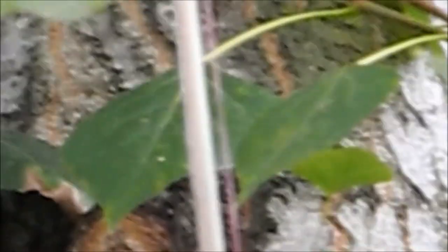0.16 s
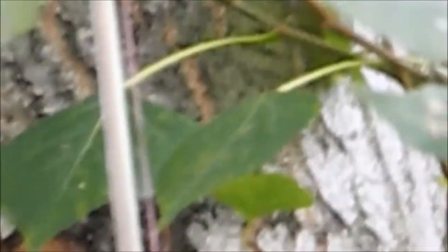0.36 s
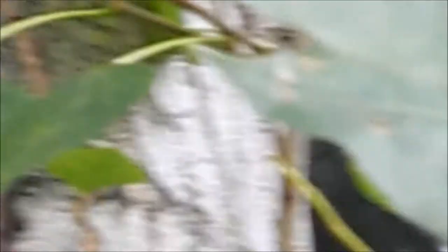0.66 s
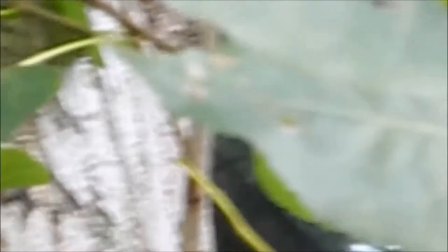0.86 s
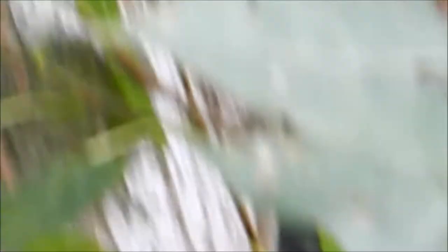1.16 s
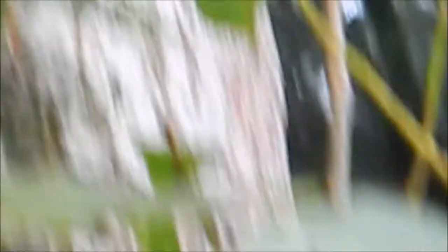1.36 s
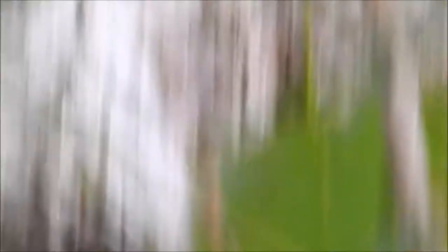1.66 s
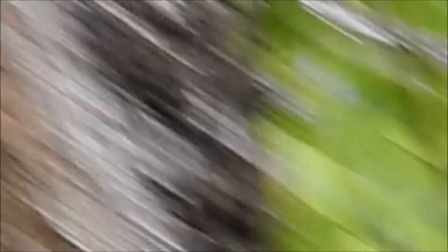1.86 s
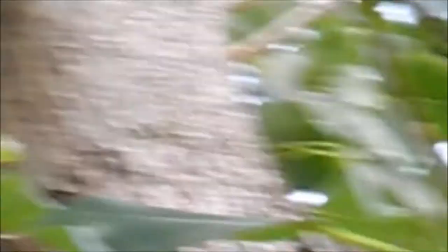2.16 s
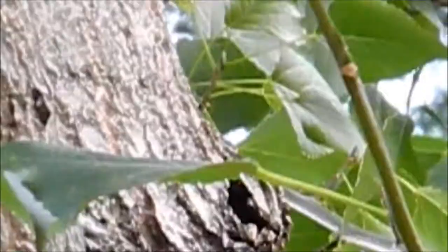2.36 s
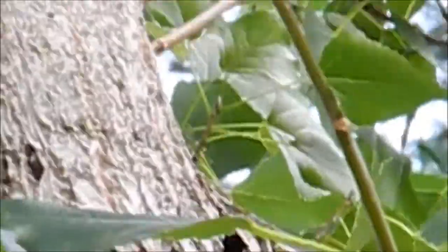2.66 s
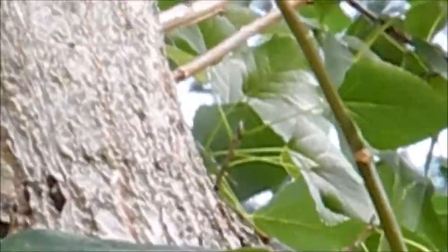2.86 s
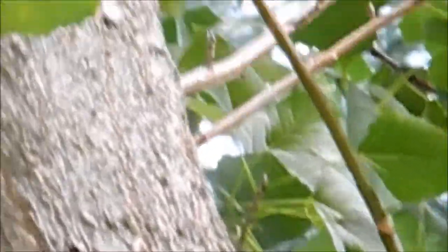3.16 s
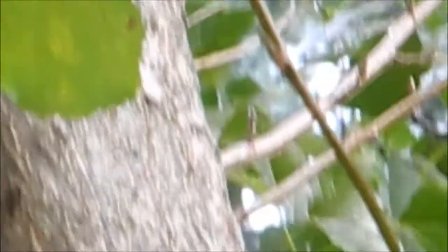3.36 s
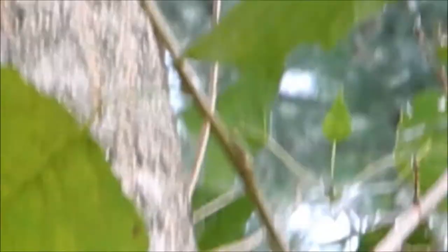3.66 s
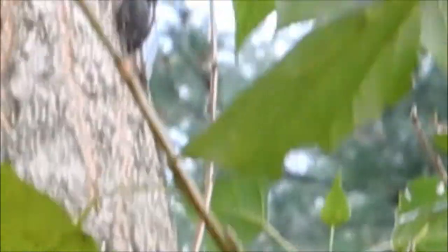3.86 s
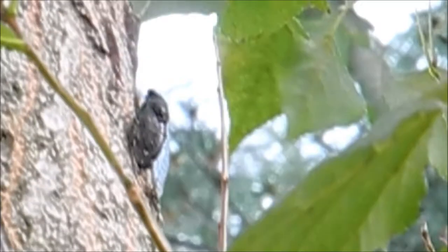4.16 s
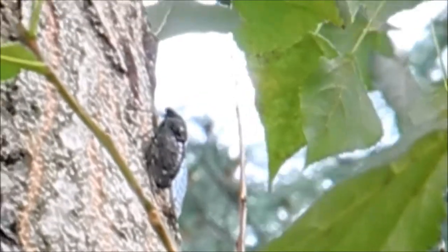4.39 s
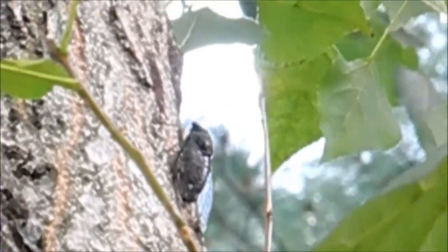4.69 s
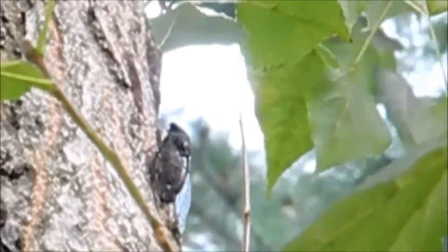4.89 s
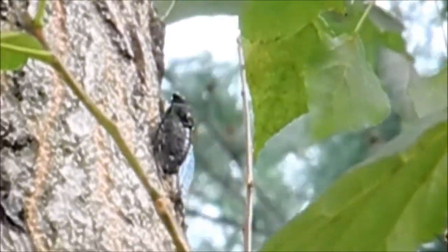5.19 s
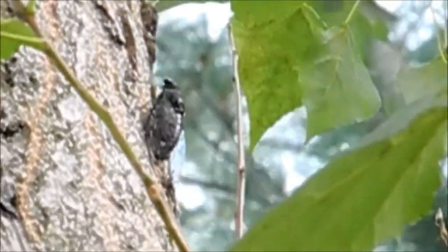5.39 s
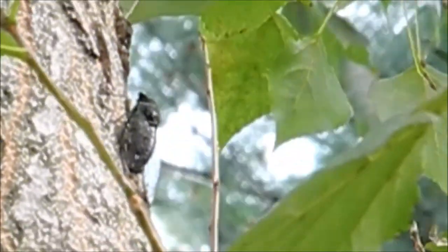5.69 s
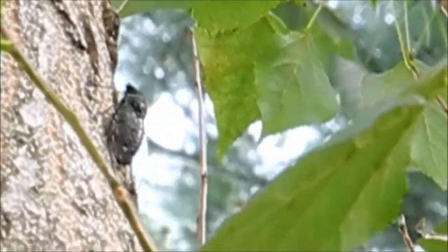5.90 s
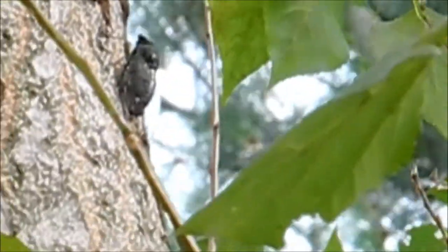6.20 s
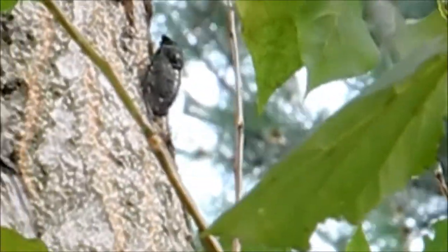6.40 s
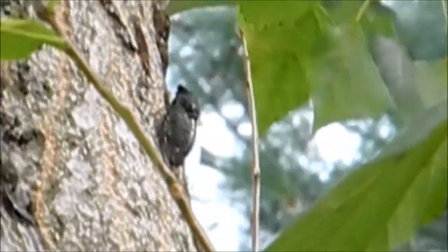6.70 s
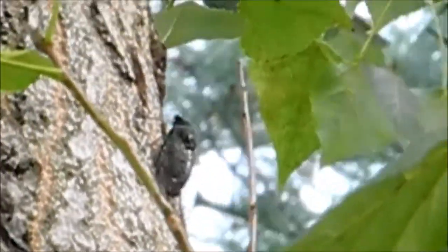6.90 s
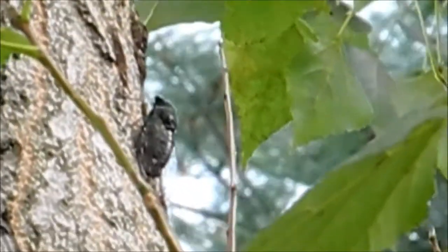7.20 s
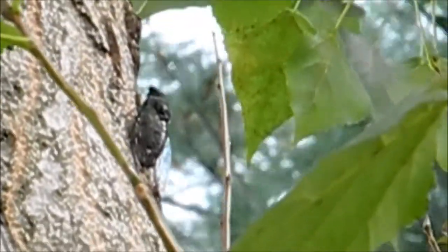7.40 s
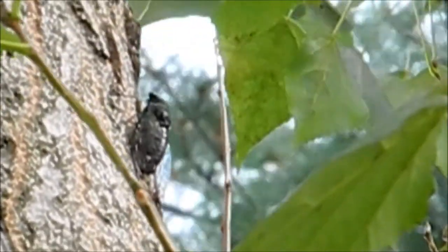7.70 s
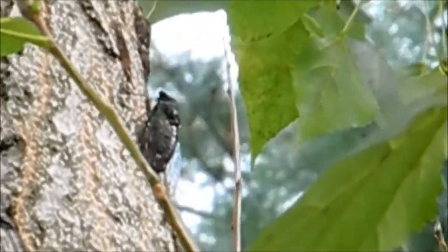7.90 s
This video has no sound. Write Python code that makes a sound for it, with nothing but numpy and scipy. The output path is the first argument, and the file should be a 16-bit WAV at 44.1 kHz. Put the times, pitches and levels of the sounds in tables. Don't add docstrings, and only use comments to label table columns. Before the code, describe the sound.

Distant road roar and a thin, high shimmer open the scene, with small bumps near the microphone and a rough engine drone fading by two seconds. Meanwhile a cicada starts faintly, swells and brightens, then dominates with a dry, metallic, rapidly pulsing rattle, slightly right of centre. Leaves and bark add short, fluttering reflections; the background is pushed down.

```python
import sys
import numpy as np
from scipy import signal
from scipy.fft import rfft, irfft
from scipy.io import wavfile
from scipy.ndimage import uniform_filter1d

SR = 44100
rng = np.random.default_rng(int(sys.argv[2]) if len(sys.argv) > 2 else 0)


def decibels_to_gain(level_db):
    exponent = np.asarray(level_db, float) / 20
    return 10 ** exponent


def wrap_up_sound(samples):
    columns = np.atleast_2d(samples).T
    tamed = np.clip(columns, -1, 1)
    steps = np.round(tamed * 32767).astype(np.int16)
    wavfile.write(sys.argv[1], SR, steps)


N = 355005

# (time [s], early plateau level [dB], added treble [share], inverted
SINGING_EFFORT = [
    (0, -57, .1, .1),
    (.4, -42.5, .1, .1),
    (1.0, -35.5, .15, .2),
    (1.5, -31, 0.33, 0.36),
    (2.0, -26, 0.55, 0.28),
    (2.8, -23, 0.3, 0.35),
    (3.3, -22, 0.24, 0.22),
    (5.0, -22.5, -0.071, 0.041),
    (8.05, -22, -0.077, 0.039),
]


def in_time(rows):
    s, *columns = np.transpose(rows)
    return [np.interp(np.arange(N) / SR, s, column) for column in columns]


def at_hz(points):
    hz, value = np.transpose(points)
    grid_hz = np.arange(1, N // 2 + 2) * SR / N
    return np.interp(np.log(grid_hz), np.log(hz), value)


def rms_one(x):
    return x / np.sqrt(np.mean(x ** 2) + 1e-20)


def drift(rate):
    knots = int(N / SR * rate) + 2
    return np.interp(np.arange(N) * rate / SR, np.arange(knots), rng.standard_normal(knots))


def ring(clicks, hz, t60):
    r = decibels_to_gain(-60 / (t60 * SR))
    w = 2 * np.pi * min(hz, SR * .45) / SR
    return signal.lfilter([0, np.sin(w)], [1, -2 * r * np.cos(w), r * r], clicks + 1e-18)


def filtered(x, order, hz, kind):
    return signal.sosfilt(signal.butter(order, hz, kind, fs=SR, output="sos"), x)


def wide_noise(spectrum):
    # (frequency [Hz], left-right likeness [0-1])
    likeness = [(50, 0.83), (500, 0.78), (1200, 0.46), (2200, 0.39), (7000, 0.053), (15000, 0.12)]
    mid, side = rfft(rng.standard_normal((2, N)))
    alike = np.clip(at_hz(likeness), 0, 1)
    pair = np.sqrt(1 + alike) * mid + np.sqrt(1 - alike) * side * [[1], [-1]]
    return rms_one(irfft(pair * decibels_to_gain(at_hz(spectrum)), N))


def rumble(level_db):
    # (time [s], swell [dB])
    gusts = [(.33, 5), (1.15, 1), (1.51, 7), (1.77, 7), (2.08, 9), (3.35, 5), (3.67, 7), (4.38, -1),
             (5.18, 7), (5.47, 3), (6.9, 5), (7.761, 15)]
    gust_s, wander_db = 0.024, -2
    t = np.arange(N) / SR
    swell_db = sum(db * np.exp(-((t - s) / gust_s) ** 2) for s, db in gusts)
    low = wide_noise([(22, -22), (45, -5), (60, 0), (80, -6), (140, -30)])
    return decibels_to_gain(level_db + swell_db + wander_db * drift(6)) * low


def traffic(swing_db):
    # (time [s], traffic [dB], low rumble [dB])
    ground = [
        (0, -35, -46),
        (1.2, -34.5, -41.5),
        (2.1, -34.5, -45),
        (3.2, -35, -44),
        (3.6, -36, -52),
        (4.5, -37.5, -49.5),
        (8.05, -38.5, -49.5),
    ]
    # (frequency [Hz], level per Hz [dB])
    road_colour = [(25, -24), (60, -9.5), (130, -5), (324, -7), (550, -7), (950, -5), (1300, -8.5),
                   (2000, -14.5), (2800, -19.5), (4300, -17.5), (10500, -20.5), (15500, -40)]
    roar_db, rumble_db = in_time(ground)
    pumping = decibels_to_gain(0.12 * swing_db)
    roar = decibels_to_gain(roar_db + 0.82 * drift(16)) * pumping * wide_noise(road_colour)
    return roar + rumble(rumble_db)


def engine_drone():
    # (time [s], pitch [Hz], level [dB])
    passing = [
        (0, 600, -52),
        (.6, 540, -51),
        (.8, 520, -45.5),
        (1.4, 530, -46.5),
        (1.9, 510, -56),
        (2.5, 500, -70),
        (8.05, 500, -70),
    ]
    hz, level_db = in_time(passing)
    return decibels_to_gain(level_db) * drift(110) * np.sin(2 * np.pi * np.cumsum(hz) / SR)


def narrow_haze(swing_db):
    # (frequency [Hz], level per Hz [dB])
    haze_colour = [(4000, -26), (6000, -12), (6900, -7), (7150, -1), (7400, 0), (7700, -6), (9000, -11),
                   (11000, -15), (14000, -26)]
    level_db, follows = -32.5, 0.31
    return decibels_to_gain(level_db + follows * swing_db) * wide_noise(haze_colour)


def knocks():
    # (time [s], peak [dB], pitch [Hz], ring [cycles], rise [s], t60 [s])
    knock_list = [
        (.05, -30.5, 940, 4.7, 0.0086, 0.16),
        (.205, -34, 850, 6.5, 0.018, 0.15),
        (1.28, -37, 900, 39, 0.011, 0.1),
        (.735, -32.5, 510, 8, 0.011, 0.12),
        (1.096, -34, 1615, 110, 0.0087, 0.12),
        (1.755, -40, 65, 6.5, 0.0094, 0.1),
        (2.045, -33, 530, 11, 0.012, 0.14),
        (2.801, -34, 300, 5, 0.0062, .06),
        (3.341, -30, 630, 4.7, 0.0066, 0.087),
    ]
    out = np.zeros(N + SR)
    t = np.arange(SR // 4) / SR
    for s, peak_db, hz, cycles, rise, t60 in knock_list:
        settled = ring(rng.standard_normal(2 * len(t)), hz, cycles / hz)[len(t):]
        shape = np.minimum(t / rise, 1) * decibels_to_gain(-60 * np.maximum(t - rise, 0) / t60)
        start = round(s * SR)
        out[start:start + len(t)] += decibels_to_gain(peak_db) * shape * rms_one(settled)
    return out[:N]


def foliage(x, t60, first_s, bright_db, still=.6):
    t = np.arange(SR // 6) / SR
    out = 0
    # (sway rate [Hz], phase [radians])
    for rate, shift in [(13.7, 0), (13.7, np.pi / 2), (6.1, 0), (6.1, np.pi / 2)]:
        tail = rng.standard_normal((2, len(t))) * decibels_to_gain(-60 * t / t60) * (t > first_s)
        tail = tail / np.sqrt(2 * np.sum(tail ** 2, axis=1, keepdims=True))
        tail = tail + decibels_to_gain(bright_db) * filtered(tail, 2, 10800, "high")
        sway = np.cos(2 * np.pi * rate * np.arange(N) / SR + shift)
        out = out + signal.oaconvolve(x[None] * (still + sway), tail, axes=1)[:, :N]
    return out


def inverted_repeat(near):
    repeat_cut_hz, repeat_delay_s = 5700, .00145
    treble, echo = in_time(SINGING_EFFORT)[1:]
    dull = signal.sosfiltfilt(signal.butter(3, repeat_cut_hz, fs=SR, output="sos"), near)
    near = near - echo * np.roll(dull, round(repeat_delay_s * SR), axis=1)
    return near + treble * filtered(near, 2, 10500, "high")


def throb():
    corners = [
        .04,
        .2,
        .45,
        .70,
        .875,
        .945,
    ]
    pace_number = [0, 2, 9, 15, 20, 23, 27, 31, 42, 47, 48, 49, 54, 59, 62, 76, 82, 83]
    pace_s = [-.05, .174, .893, 1.482, 1.953, 2.263, 2.635, 3.024, 4.055, 4.545, 4.627, 4.729, 5.189, 5.68,
              5.953, 7.33, 7.957, 8.052]
    gap_db, crest_db, sag_db = -4.5, 4, 2
    uneven_db = 0.68
    number = np.arange(pace_number[-1] + 1)
    start = np.interp(number, pace_number, pace_s)
    place = np.interp(np.arange(N) / SR, start, number) % 1
    times = start[:-1, None] + np.diff(start)[:, None] * corners
    chance_db = uneven_db * rng.standard_normal((len(start), 3))
    gap, early, crest = (chance_db + [gap_db, 0, crest_db]).T
    next_gap = np.roll(gap, -1)
    levels = np.stack([gap, early - .5, early + .5, crest, crest - sag_db, next_gap], axis=1)[:-1]
    curve_db = np.interp(np.arange(N) / SR, times.ravel(), levels.ravel())
    return place, in_time(SINGING_EFFORT)[0] + curve_db


def cicada(place, swing_db, uneven_db, colour_db):
    # (place in the throb [0-1], stroke period [ms], rib delay [ms], timing jitter [ms])
    stroke_table = [(0, 4.7, 1.6, .2), (.08, 4.5, 1.45, .05), (.17, 4.0, 1.38, .012),
                    (.27, 3.78, 1.38, .01), (.58, 3.36, 1.47, .006), (.69, 3.1, 1.52, .006),
                    (.85, 2.83, 1.6, .006), (.92, 2.8, 1.65, .1), (1, 2.8, 1.7, .2)]
    # (frequency [Hz], share of the throb it follows [ratio], first rib [dB], second rib [dB])
    modes = [(4310, 0.85, -15, -22), (4730, 1.2, -18.5, -12.5), (5393, 0.86, -5.5, -15),
             (6733, 0.8, 1, -6.5), (7730, 1.07, 7.5, 1), (8285, 1.13, 2.5, 8), (9210, 1.16, -4, 2.5),
             (10320, 0.45, -8, -9), (12420, 0.76, -13.5, -13.5), (12150, 0.85, -13.5, -16.5),
             (14140, 0.93, -22, -15.5)]
    ring_t60_s = [.008, .008, .004, .004, .0025, .0025, .0025, .0025, .002, .002, .002]
    share, period, delay, jitter = np.transpose(stroke_table) * [[1], [.001], [.001], [.001]]
    strokes = np.cumsum((1 + .025 * drift(8)) / np.interp(place, share, period)) / SR
    at = np.flatnonzero(np.diff(np.floor(strokes)))
    exact = at + 1 - strokes[at + 1] % 1 / (strokes[at + 1] - strokes[at])
    chance = rng.standard_normal((len(at), 4 + 2 * len(modes)))
    here = place[at]
    weight = np.sqrt(np.interp(here, share, period / period[0]))
    dulling_db = np.interp(here, [0, .7, .88, 1], [1, 0.5, 6.5, 6.5])
    alike = np.interp(here, [.4, .65], [0, .7])
    out = np.zeros(N)
    for rib in range(2):
        late_s = rib * np.interp(here, share, delay) + np.interp(here, share, jitter) * chance[:, rib]
        when = exact + SR * late_s
        taps = when.astype(int)[:, None] + np.arange(-5, 7)
        offset = taps - when[:, None]
        spread = np.sinc(offset) * np.cos(offset * np.pi / 12) ** 2
        for k, (hz, follow, *rib_db) in enumerate(modes):
            blow_db = uneven_db * chance[:, 2 + rib] + colour_db * chance[:, 4 + 2 * k + rib]
            throb_db = (follow - 1) * swing_db[at] - dulling_db * np.log2(hz / 7500)
            rib_now_db = rib_db[rib] + alike * (np.mean(rib_db) - rib_db[rib])
            size = weight * decibels_to_gain(rib_now_db + blow_db + throb_db)
            strikes = (size[:, None] * spread).ravel()
            clicks = np.bincount(np.clip(taps, 0, N - 1).ravel(), strikes, N)
            out += (-1) ** k * ring(clicks, hz, ring_t60_s[k])
    return rms_one(filtered(out, 3, 3350, "high"))


def microphones(sound):
    # (frequency [Hz], left minus right [dB])
    shadow = [(60, -4.5), (110, -4), (200, -3.5), (380, -3), (700, -4.5), (1290, -5.0), (2380, -6),
              (4400, -3.5), (8120, -1.5), (15000, -10)]
    # (frequency [Hz], left leads [radians])
    port_lead = [(100, 0.5), (1000, -.5), (2200, -3), (3600, -5), (5700, -5), (7500, -5), (10000, -6),
                 (15500, -5.5)]
    level = decibels_to_gain(at_hz(shadow) / 2)
    left, right = rfft(sound)
    return irfft([left * level * np.exp(1j * at_hz(port_lead)), right / level], N)


def ducking():
    # (time [s], depth [dB], recovery [s])
    ducks = [(2.14, 1.5, 0.12), (2.49, 1, .15), (2.92, 2, 0.069), (3.09, 3.5, 0.073), (3.38, 3.5, 0.11),
             (3.46, 2.5, 0.11), (3.755, 7, 0.059), (4.04, 4.0, 0.18), (4.4, 2, 0.18), (4.78, 3, 0.18),
             (5.08, 3, 0.091), (5.34, 2.5, 0.065), (5.54, 2, 0.52), (5.84, 2, 0.062), (5.96, 1.5, 0.13),
             (6.22, 2.5, 0.038), (6.52, 2.2, .15), (6.79, 1, 0.12), (7.41, 6.5, 0.11), (7.81, 2.5, 0.093)]
    attack_s = 0.023
    drop_db = 0
    for s, depth_db, recovery_s in ducks:
        since = np.maximum(np.arange(N) / SR - s, 0)
        drop_db = drop_db + depth_db * np.minimum(since / attack_s, 1) * np.exp(-since / recovery_s)
    return decibels_to_gain(-drop_db)


def scene():
    place, song_db = throb()
    swing_db = song_db - uniform_filter1d(song_db, size=8000)
    song = cicada(place, swing_db, uneven_db=1.0, colour_db=.8) * decibels_to_gain(song_db)
    leaves = foliage(song, t60=.05, first_s=.0005, bright_db=5.0)
    near = inverted_repeat(decibels_to_gain(-1.5) * (song + decibels_to_gain(-9) * leaves))
    background = traffic(swing_db) + narrow_haze(swing_db) + knocks() + engine_drone()
    return microphones(near + background)


def roll_off(x):
    return signal.sosfilt(signal.butter(12, 15760, fs=SR, output="sos"), x)


def record(dry):
    overload = .85
    notch_hz, notch_width_hz = 8845, 60
    rounded = overload * np.tanh(dry * ducking() / overload)
    b, a = signal.iirnotch(notch_hz, notch_hz / notch_width_hz, fs=SR)
    mix = signal.lfilter(b, a, rounded)
    return roll_off(mix)


dry = scene()
out = record(dry)
wrap_up_sound(out)
```